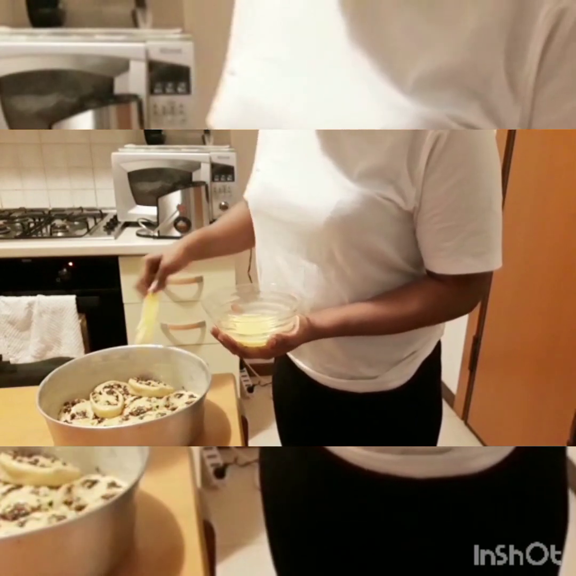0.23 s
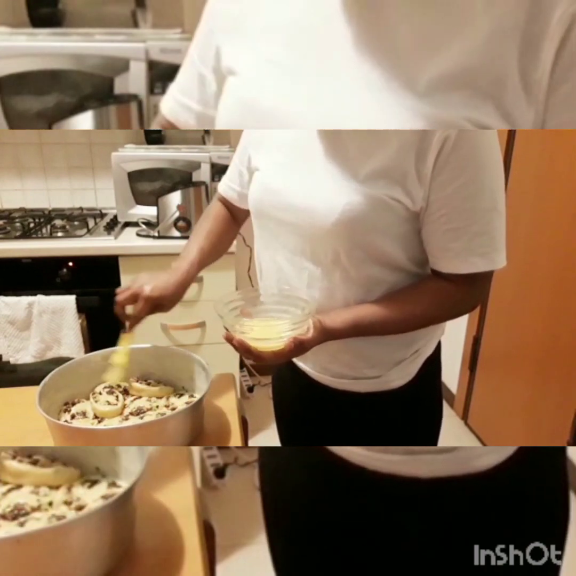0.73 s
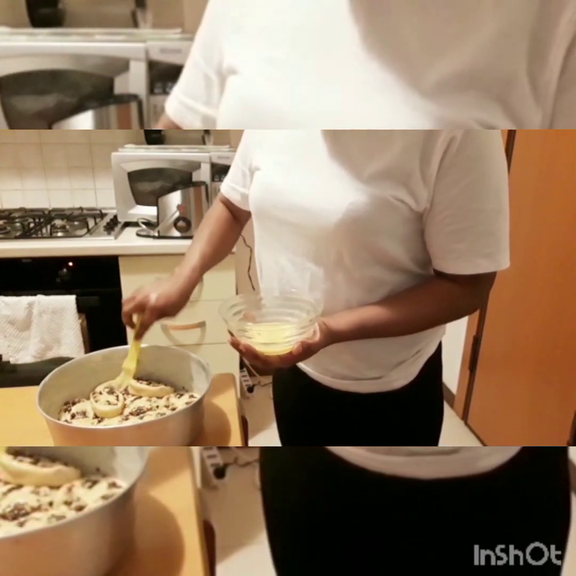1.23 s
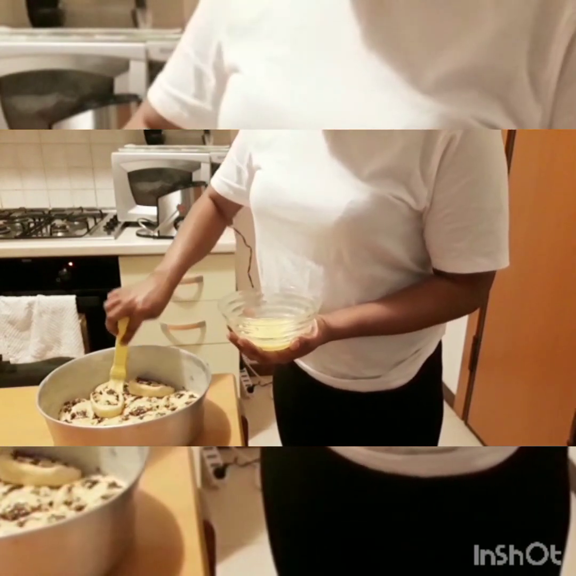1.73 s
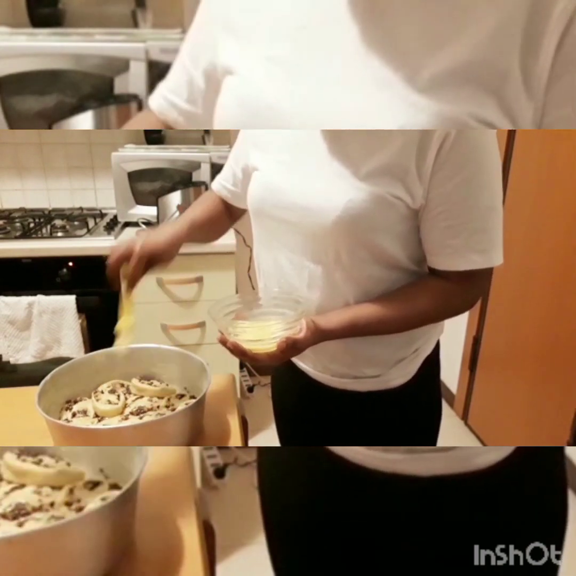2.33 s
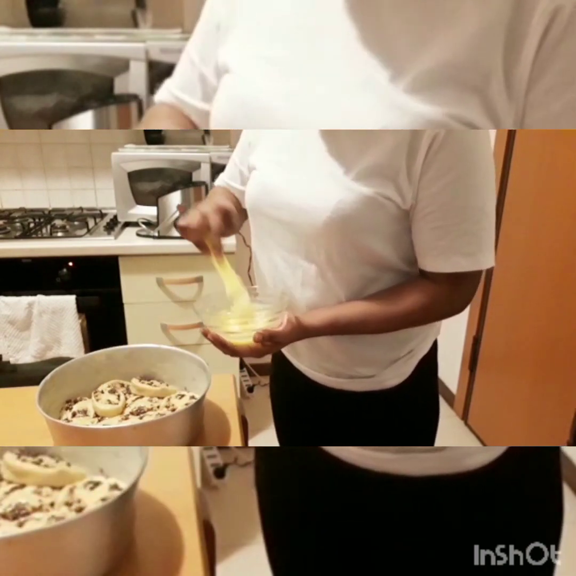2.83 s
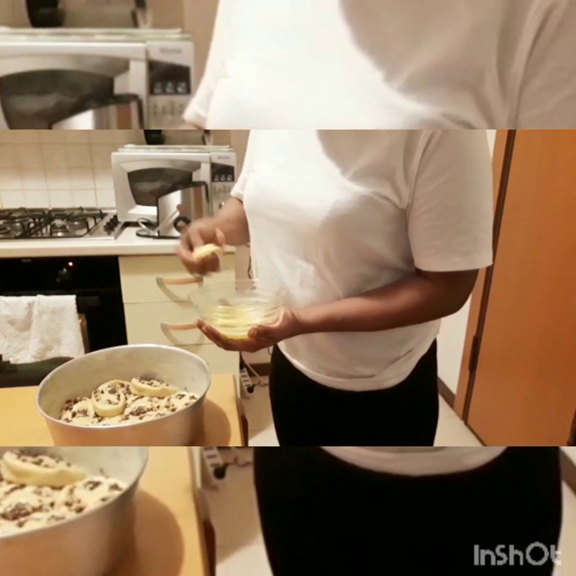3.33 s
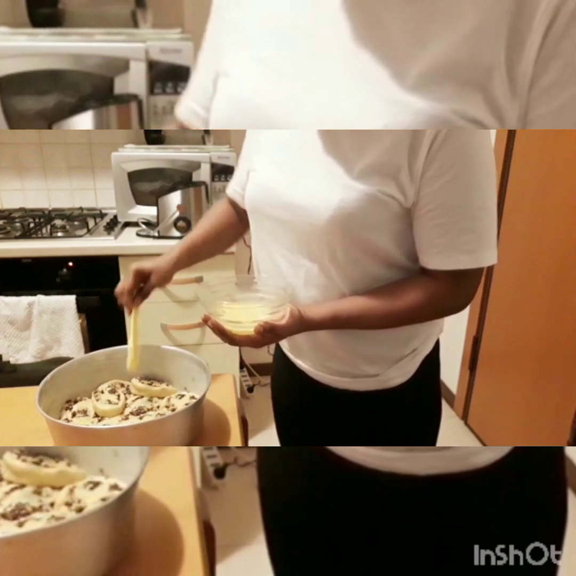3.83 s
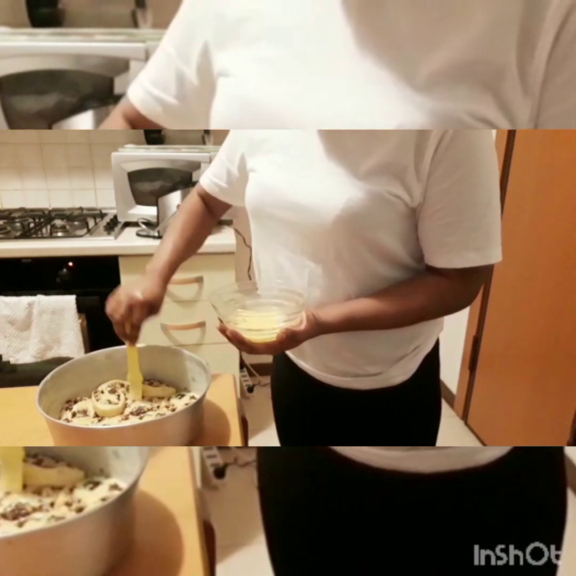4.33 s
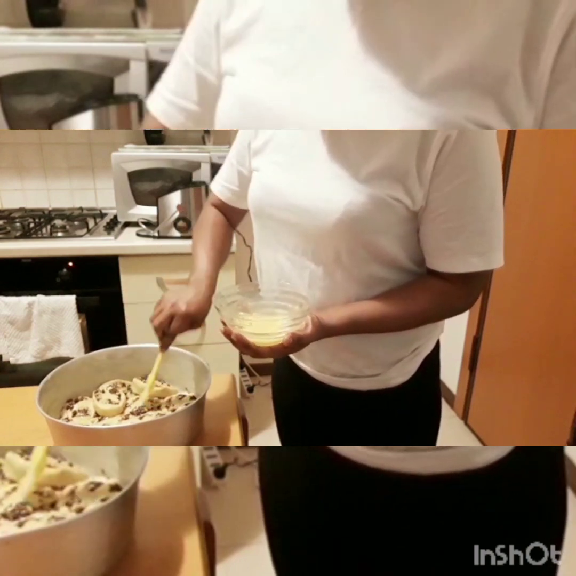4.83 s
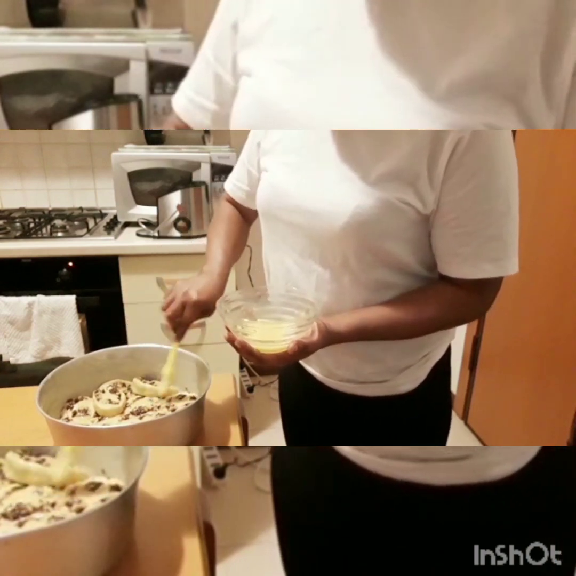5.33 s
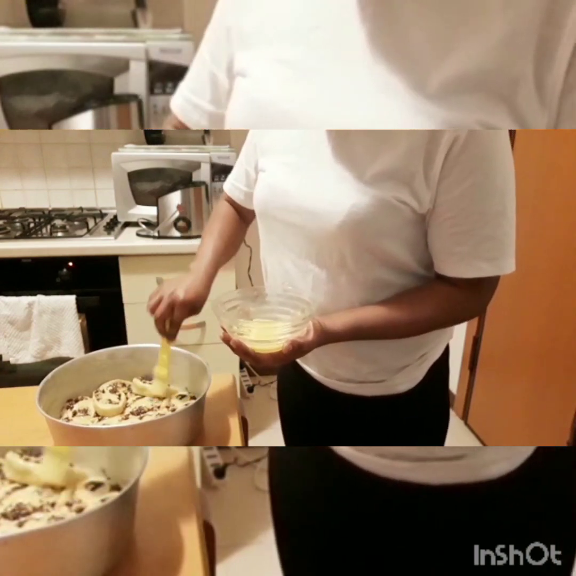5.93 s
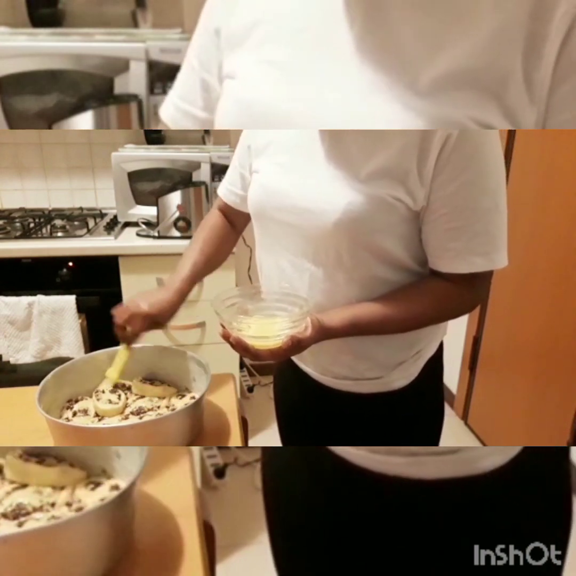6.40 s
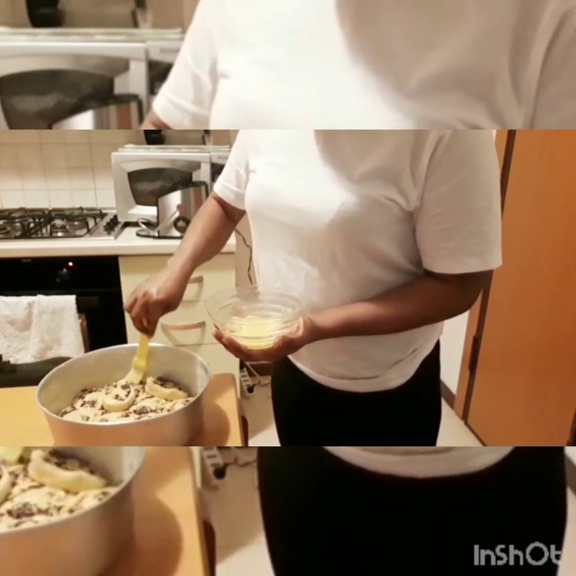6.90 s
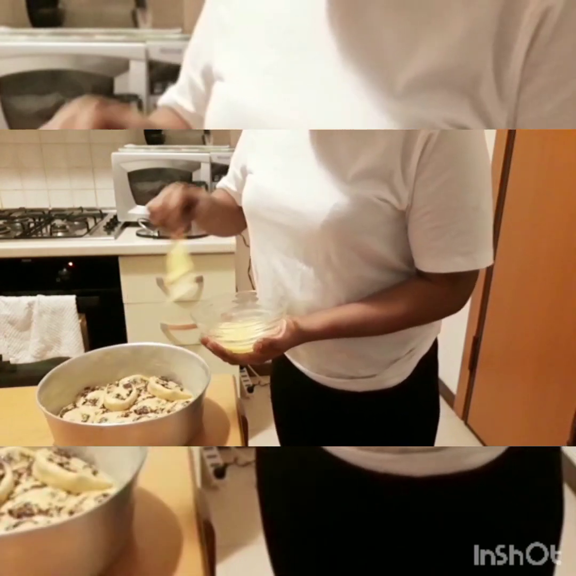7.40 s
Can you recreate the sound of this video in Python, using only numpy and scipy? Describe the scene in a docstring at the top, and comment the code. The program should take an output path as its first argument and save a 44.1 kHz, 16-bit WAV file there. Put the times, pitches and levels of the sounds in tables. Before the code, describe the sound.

In a small tiled kitchen, a pastry brush's hard plastic head knocks a metal tin in short damped rings, with quick scrapes and faint wet crackle in the first two seconds. A glass tick and tiny plop follow, then near-quiet, then stronger knocks from five to seven seconds and a final soft dip. A low appliance hum runs throughout. Close microphone, lively short room reflections.

```python
"""Knocks and scrapes ring on a metal tin amid wet squelches and ticks, over a low steady hum.
A pastry brush spreads beaten egg over buns in a round baking tin, in a tiled kitchen: its plastic head
strikes the tin's damped modes, its wet bristles crackle in random clicks, and threads of egg snap.
Twice the brush dips into a glass bowl of egg. An appliance is filtered noise with wavering hum lines."""
import sys
import numpy as np
from scipy import signal
from scipy.fft import rfft, irfft
from scipy.io import wavfile

SR = 44100
rng = np.random.default_rng(int(sys.argv[2]) if len(sys.argv) > 2 else 0)


def output_pcm(signal):
    """Save a mono or channel-first signal as 16-bit PCM at the path in sys.argv[1].

    Samples are clipped to [-1, 1] before scaling.
    """
    pcm = np.clip(np.atleast_2d(signal).T, -1, 1) * 32767
    wavfile.write(sys.argv[1], SR, np.round(pcm).astype(np.int16))


N = 337806  # samples
TAPS = 8192  # filter design length, samples
BINS = np.fft.rfftfreq(TAPS, 1 / SR)  # Hz

# head dragged along the tin wall: (hardest moment [s], length [s], level [dB], body zone [dB],
# wall resonance [Hz], spray of the trailing bristles [dB])
SCRAPES = [(0.615, 0.054, -35.5, 9.5, 2000, 0), (0.926, 0.026, -56, 12, 2100, 1),
           (1.198, 0.032, -38.5, 6, 1900, 0), (1.742, 0.034, -39.5, 2, 3820, -5),
           (1.98, 0.03, -40, 3.5, 1880, -9), (2.204, 0.04, -28, 3, 6530, -4),
           (6.35, 0.036, -44.5, 10, 4000, -8), (6.709, 0.042, -27, 3.5, 2650, 2.5)]
DAB_RISE_SHARE, BRISTLE_SMACK_DB = 0.48, 3.5  # bristles on dough and behind a scrape


def amp(db):
    """Decibels to gain."""
    return 10 ** (np.asarray(db) / 20)


def unit(x):
    """Scales to rms 1."""
    return x / np.sqrt(np.mean(x ** 2) + 1e-20)


def read(points, hz):
    """Reads (Hz, value) rows on a log-frequency axis."""
    f, value = np.transpose(points)
    return np.interp(np.log(hz + 1), np.log(f + 1), value)


def add(mix, s, sound):
    """Mixes a sound in at time s."""
    part = mix[max(round(s * SR), 0):][:len(sound)]
    part += sound[:len(part)]


def bump(hz, width_hz):
    """Shape of one resonance, 1 at its centre."""
    return 1 / (1 + (2 * (BINS - hz) / width_hz) ** 2)


def ring(db, delay_s=0):
    """Causal impulse response of a dB curve; each frequency may arrive with its own delay."""
    log_gain = np.log(amp(np.concatenate([db, db[-2:0:-1]])))
    causal = np.exp(np.conj(signal.hilbert(log_gain)))[:len(BINS)]  # minimum phase
    delay_sum = np.cumsum(delay_s * np.ones(len(BINS)))  # group delay to phase
    lag = np.exp(-2j * np.pi * delay_sum * SR / TAPS)
    return irfft(causal * lag)[:TAPS // 2]


def swell(top, length, rise_share):
    """Start, hardest moment and end of a stroke."""
    start = top - length * rise_share
    return start, top, start + length


def stroke(start, top, end, per_s, spread_db, depth_db):
    """Random tiny clicks under a pressure that swells and lets go."""
    t = np.arange(start, end, 1 / SR)
    chance, size = rng.random((SR, 2))[:len(t)].T
    happens = chance < per_s / SR
    height = amp(-spread_db * np.log(np.maximum(size, .03)))
    clicks = happens * height * (-1) ** np.arange(len(t))
    pressure_db = np.interp(t, [start, top, end], [-depth_db, 0, -depth_db])
    return unit(clicks) * amp(pressure_db)


def tin_colour(boom_db, thud_db, body_db, tick_db, fizz_db):
    """Response of the tin; where the head touches decides which zones speak."""
    # centres of boom, thud, body, clack, tick, fizz: [Hz]
    zones_hz = [280, 650, 1300, 3000, 5600, 11000]
    # broad response: (frequency [Hz], level [dB])
    broad = [(60, -30), (160, -14), (280, -9.5), (400, -11), (560, -5), (1000, -6.5), (1600, -4.5),
             (2100, -6.5), (2900, 1), (4200, -8), (5900, -5.5), (6900, -11), (8400, -14), (9600, -29.5),
             (15500, -31.5)]
    # damped modes and the gaps between them: (frequency [Hz], width [Hz], level over the broad response [dB])
    tin_modes = [(661, 35, 3.5), (786, 31, 7), (900, 160, -3.5), (1043, 23, 6), (1110, 29, 1),
                 (1250, 12, 3.5), (1360, 130, -0.5), (1563, 31, 6), (1670, 57, 2.5), (1825, 31, 7),
                 (1960, 7.1, 6), (2050, 200, -1.5), (2280, 45, 3), (2250, 80, -0.5), (2560, 57, 4),
                 (2750, 60, 1), (2940, 7.2, -0.5), (2990, 41, 8), (3080, 41, 1), (3180, 41, 7),
                 (3344, 57, 6.5), (3680, 160, -4.5), (3755, 11, 12), (4220, 60, 5), (4340, 50, 2.5),
                 (4900, 170, -2.5), (5400, 90, -3)]
    modes = sum(db * bump(hz, width_hz) for hz, width_hz, db in tin_modes)
    zones = list(zip(zones_hz, [boom_db, thud_db, body_db, 0, tick_db, fizz_db]))
    return read(broad, BINS) + modes + read(zones, BINS)


def knocks(bend_s=0.0016, across_s=.00105, across=0.56):
    """Each blow bends the wall: treble runs ahead of bass, and one wall mode beams straight out."""
    # head on tin: (time [s], force [dB], thud [dB], thud pitch [Hz], body [dB],
    # beamed ping [Hz], ping level [dB])
    blows = [ (0.4752, 3.5, 7, 643, -2.5, 6150, 11), (1.165, -5.5, 1.5, 580, 2, 2980, 1),
             (1.7199, -15.5, -7, 740, -2, 3300, 5), (1.9587, -16.5, -4, 680, -4, 5500, -9),
             (2.1013, -1.5, 4.5, 660, 5, 6400, 7), (2.1665, -6, 2, 610, 7.5, 3000, 2),
             (2.2024, -14, -7, 553, -6, 2950, 29), (5.2513, 5.5, 1, 830, 1.5, 3580, 11.5),
             (5.4934, 13.5, -2, 560, 0, 5600, 13.5), (5.7516, 12.5, -2, 574, 2, 5260, 15.5),
             (6.327, -13.5, 0, 636, -4.5, 5807, 15), (6.3892, -11.5, 3, 637, 10.5, 1700, 2),
             (6.5985, 5, 2, 654, 3, 1720, -3), (6.852, 10, 3, 680, 0.5, 3040, 12.5),
             (7.0906, 16.5, -2.5, 685, 7, 2850, 8)]
    boom_db, tick_db, fizz_db, direct_db = 1.5, 0.7, -5, -5.5  # before force, thud and ping shift them
    # a harder blow is shorter: less boom, more fizz, a sharper direct crack (dB per dB of force)
    boom_per_force, fizz_per_force, direct_per_force = -0.49, 0.26, .18
    # a blow cushioned by egg and dough booms with its thud and loses fizz (dB per dB of thud)
    boom_per_thud, fizz_per_thud = .9, -0.21
    fizz_per_octave = 2.2  # a stiffer spot pings higher and fizzes more (dB per octave over 3 kHz)
    thud_width_hz, thud_mode_db, ping_width_hz = 99, 7, 760
    out = np.zeros(N)
    delay_s = bend_s * np.sqrt(3000 / (BINS + 500))
    beam = read([(500, -5.5), (3000, -5), (8000, -1.5), (13000, 2)], BINS)  # dB
    for s, db, thud, thud_hz, body, ping_hz, ping_db in blows:
        boom = boom_db + boom_per_force * db + boom_per_thud * thud
        fizz = fizz_db + fizz_per_force * db + fizz_per_thud * thud
        fizz += fizz_per_octave * np.log2(ping_hz / 3000)
        colour = db + tin_colour(boom, thud, body, tick_db, fizz)
        colour += thud_mode_db * bump(thud_hz, thud_width_hz)
        facing = beam + direct_db + direct_per_force * db + ping_db * bump(ping_hz, ping_width_hz)
        direct = ring(colour + facing, delay_s - delay_s[-1] / 2)
        add(out, s, direct)
        add(out, s + across_s, across * direct)  # off the far wall of the tin
        add(out, s, kitchen(ring(colour)))
    return out


def scrapes(direct_db=-3):
    """The head sticks and slips along the wall, a rattle of tiny blows that sings in one resonance."""
    rise_share, wall_db, wall_width_hz = .75, 6.5, 380
    out = np.zeros(N)
    for s, length, db, body, wall_hz, _ in SCRAPES:
        start, top, end = swell(s, length, rise_share)
        slips = stroke(start, top, end, per_s=1300, spread_db=3.5, depth_db=12.5)
        colour = tin_colour(boom_db=-4.5, thud_db=0.5, body_db=body, tick_db=0.5, fizz_db=-6.5)
        colour += wall_db * bump(wall_hz, wall_width_hz)
        sound = amp(db) * signal.fftconvolve(slips, ring(colour))
        add(out, start, amp(direct_db) * sound)
        add(out, start, kitchen(sound))
    return out


def wet_colour(smack_db, spray_db):
    """Bigger bubbles smack in the middle range, the finest spray in the top treble."""
    # wet bristles: (frequency [Hz], level [dB])
    wet = [(400, -35), (1200, -16.5), (2200, -12), (3200, -12), (4400, -9.5), (5600, -0.5), (6800, 0),
           (7700, 0.5), (8700, -0.5), (9500, -12.5), (14500, -5), (16000, -11)]
    tilt = [(3200, smack_db), (5500, 0), (8500, 0.0038), (11000, spray_db)]
    return read(wet, BINS) + read(tilt, BINS)


def squelch(start, top, end, colour_db):
    """Egg crackles between the bristles, each bubble size at its own pitch; gives start and sound."""
    bubble_width_hz = 2200  # of the resonance before cubing narrows it
    sizes = np.array([bump(hz, bubble_width_hz) ** 3 for hz in np.linspace(1500, 15000, num=8)])
    sound = 0
    for share_db in 10 * np.log10(sizes / sizes.sum(0)):  # the shares add up to the full power
        clicks = stroke(start, top, end, per_s=910, spread_db=0.5, depth_db=10.0)
        sound = sound + signal.fftconvolve(clicks, ring(colour_db + share_db))
    return start, sound


def snap(colour_db, decay_s=0.0017):
    """One wet tick: a decaying noise burst of unit energy through a colour."""
    burst = rng.standard_normal(TAPS) * np.exp(-np.arange(TAPS) / SR / decay_s)
    return signal.fftconvolve(burst / np.linalg.norm(burst), ring(colour_db))


def bristles(room_db=-2):
    """The bristles squelch in each dab and along each scrape; threads snap as they lift."""
    # pressed on the dough: (hardest moment [s], length [s], level [dB], spray [dB])
    dabs = [(0.467, 0.035, -55, -17), (0.884, 0.04, -58.5, -3), (0.927, 0.035, -51, 1),
            (1.11, 0.045, -63, -4), (1.375, 0.07, -66, -6), (1.48, 0.057, -58, -2), (1.64, 0.1, -64, -4),
            (4.15, 0.16, -66, -2), (4.4, 0.05, -69.5, 1), (4.66, 0.22, -75.5, 1), (4.98, 0.1, -54, -2),
            (5.12, 0.1, -71, -10), (5.216, 0.088, -52, 1), (5.493, 0.06, -51, -4), (5.752, 0.04, -52.5, 2),
            (5.914, 0.03, -59, -2), (6.004, 0.025, -59.5, -1.5), (6.3, 0.11, -54.5, -5)]
    # threads of egg snapping: (time [s], level [dB], spray [dB])
    threads = [(1.145, -18, -7), (1.486, -30, -8), (1.629, -41, 6), (1.635, -29, -1), (1.65, -34, 10),
               (1.673, -43, 5), (1.701, -39, 10), (1.711, -41, 4)]
    trail_s, trail_db, trail_per_scrape = 0.056, -53, .3  # level at the mean scrape, dB per dB of scrape
    out = np.zeros(N)
    for s, length, db, spray in dabs:
        colour = db + wet_colour(BRISTLE_SMACK_DB, spray)
        add(out, *squelch(*swell(s, length, DAB_RISE_SHARE), colour))
    usual_db = np.mean([row[2] for row in SCRAPES])
    for s, _, db, _, _, spray in SCRAPES:
        level_db = trail_db + trail_per_scrape * (db - usual_db)
        colour = level_db + wet_colour(BRISTLE_SMACK_DB, spray)
        add(out, *squelch(*swell(s, trail_s, DAB_RISE_SHARE), colour))
    for s, db, spray in threads:
        add(out, s, snap(db + wet_colour(0, spray)))
    return out + amp(room_db) * kitchen(out)[:N]


def chirp(length, hz, width_hz):
    """A brief swell of one narrow resonance, made of filtered noise."""
    tone = unit(irfft(rfft(rng.standard_normal(TAPS)) * bump(hz, width_hz)))[:round(length * SR)]
    return tone * signal.windows.tukey(len(tone), .5)


def dips(room_db=-3.0):
    """The brush ticks on the glass, stirs briefly, and the egg closes round it with a plop."""
    # brush into the bowl: (time [s], level [dB])
    dip_ticks = [(2.649, -22.5), (7.592, -27.5)]
    # damped modes of the glass: (frequency [Hz], width [Hz], level [dB])
    bowl_modes = [(3100, 500, 8), (4170, 500, 8), (7650, 900, 9)]
    bowl_db, smack_db, spray_db = -5, 2, -4
    stir_s, stir_rise_share, stir_db = 0.072, 0.16, -30.5  # dB on top of the dip level
    plop_after_s, plop_s, plop_hz, plop_width_hz, plop_db = 0.053, 0.061, 950, 420, -41  # dB likewise
    out = np.zeros(N)
    modes = sum(db * bump(hz, width_hz) for hz, width_hz, db in bowl_modes)
    glass = bowl_db + wet_colour(smack_db, spray_db) + modes
    for s, db in dip_ticks:
        add(out, s, snap(db + glass))
        add(out, *squelch(s, s + stir_rise_share * stir_s, s + stir_s, db + stir_db + glass))
        add(out, s + plop_after_s, amp(db + plop_db) * chirp(plop_s, plop_hz, plop_width_hz))
    return out + amp(room_db) * kitchen(out)[:N]


def squeaks(room_db=-2):
    """Bristles catch and sing for a moment."""
    # (time [s], length [s], frequency [Hz], width [Hz], level [dB])
    notes = [(4.163, 0.14, 2454, 50, -78), (6.255, 0.04, 5990, 800, -59.5), (6.294, 0.0094, 5870, 700, -53),
             (6.295, 0.014, 3020, 300, -54.5), (6.328, 0.012, 8200, 600, -62)]
    out = np.zeros(N)
    for s, length, hz, width_hz, db in notes:
        add(out, s, amp(db) * chirp(length, hz, width_hz))
    return out + amp(room_db) * kitchen(out)[:N]


def kitchen(x, first_s=0.0019, early_db=2.5, early_s=0.0097):
    """Dense reflections from table, tiles and cupboards, a fresh random pattern at each call."""
    # what the reflections keep of the treble: (frequency [Hz], level [dB])
    wall_loss = [(5000, -0.5), (8500, -3), (11000, -2.5), (15000, -6.5)]
    # decay: (frequency [Hz], t60 [s])
    room_t60 = [(200, 0.94), (600, 0.62), (1400, 0.48), (3000, 0.39), (5500, 0.43), (8000, 0.34),
                (14000, 0.59)]
    t = np.arange(SR * 3 // 4) / SR
    hz, when, z = signal.stft(rng.choice([-1., 1.], len(t)), SR, nperseg=256)
    fade_db = read(wall_loss, hz)[:, None] - 60 * when / read(room_t60, hz)[:, None]
    tail = signal.istft(z * amp(fade_db), SR)[1][:len(t)]
    tail *= (t > first_s) * amp(early_db * np.exp(-t / early_s))
    return signal.fftconvolve(x, tail / np.sqrt(SR * .45 / np.log(10 ** 6)))  # unit energy at t60 0.45 s


def appliance(waver=0.39):
    """A low airy rumble with slightly wavering hum lines; waver is rms phase [rad] per 100 Hz."""
    # rumble spectrum: (frequency [Hz], relative density [dB])
    floor = [(25, -28), (42, -23), (62, -7.5), (80, -18), (100, -1), (135, -2), (162, -8), (200, -7),
             (335, -4), (450, -11.5), (620, -16.5), (1000, -25.5), (2200, -35.5), (5000, -41),
             (15500, -43.5)]
    # hum lines: (frequency [Hz], level [dB])
    hum = [(48.6, -68), (100, -72), (134.6, -68), (500.6, -78.5), (597.5, -76.5)]
    floor_db = -60  # rms
    t = np.arange(N) / SR
    shape = amp(read(floor, np.fft.rfftfreq(N, 1 / SR)))
    rumble = unit(irfft(rfft(rng.standard_normal(N)) * shape, N))
    out = amp(floor_db) * rumble
    for hz, db in hum:
        drift = unit(sum(np.sin(2 * np.pi * (f * t + rng.random())) / f
                         for f in np.geomspace(.3, 5, num=12)))
        phase = 2 * np.pi * hz * t + waver * (hz / 100) * drift
        out += amp(db) * np.sqrt(2) * np.sin(phase)
    return out


def scene():
    """Everything heard from one spot across the table."""
    return (knocks() + scrapes() + bristles() + dips() + squeaks() + appliance())[None]


def record(dry):
    """The recorder's band limit."""
    edge_hz = 16100
    lowpass = signal.firwin(511, edge_hz, window=("kaiser", 9), fs=SR)
    return signal.oaconvolve(dry, lowpass[None], "same")


dry = scene()
out = record(dry)
output_pcm(out)
```